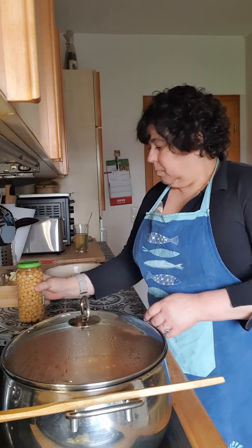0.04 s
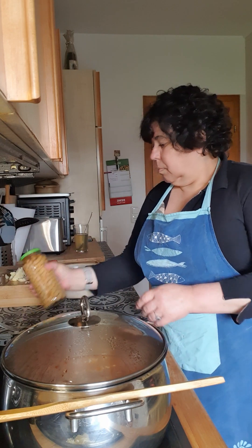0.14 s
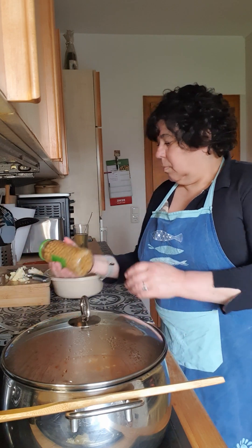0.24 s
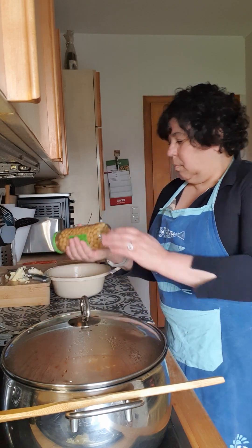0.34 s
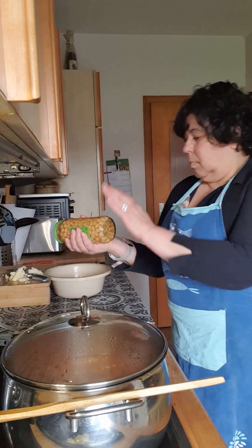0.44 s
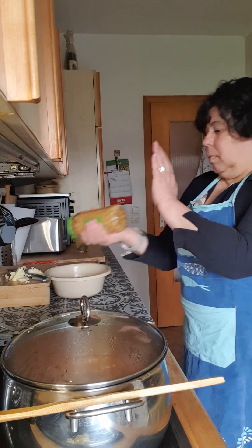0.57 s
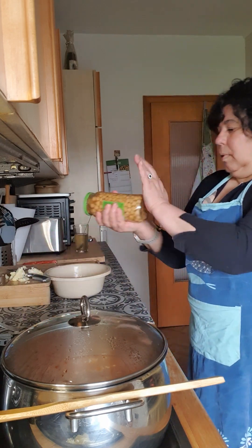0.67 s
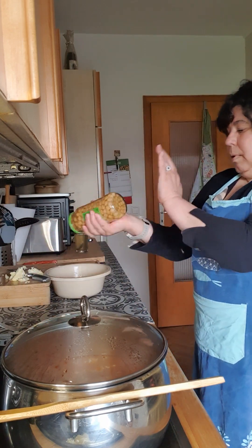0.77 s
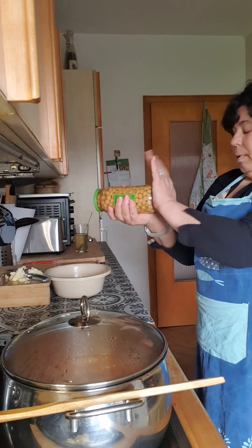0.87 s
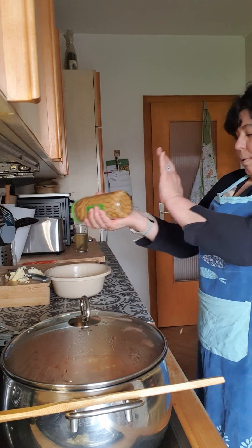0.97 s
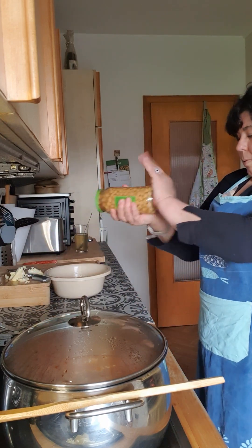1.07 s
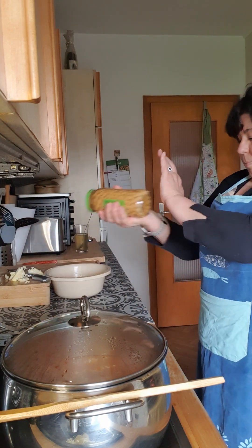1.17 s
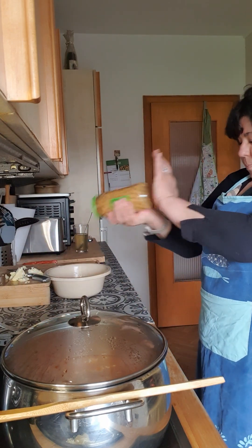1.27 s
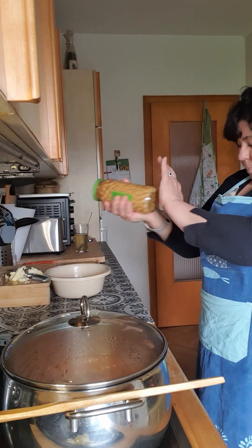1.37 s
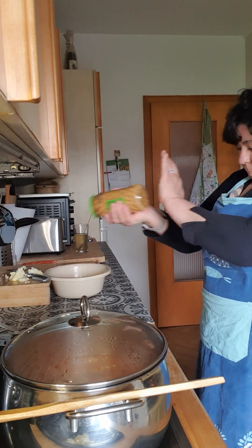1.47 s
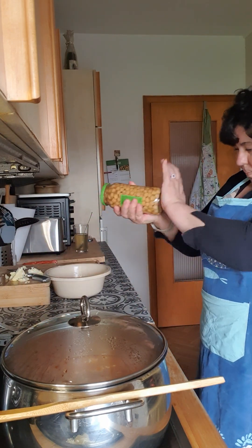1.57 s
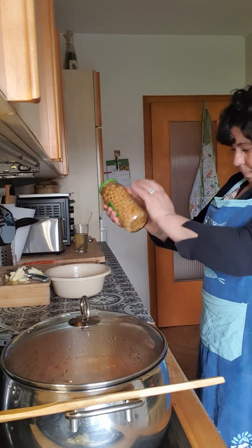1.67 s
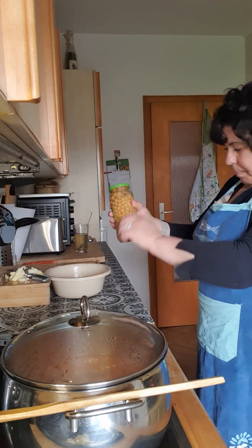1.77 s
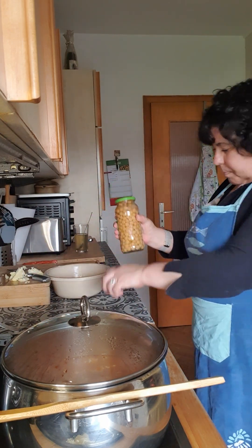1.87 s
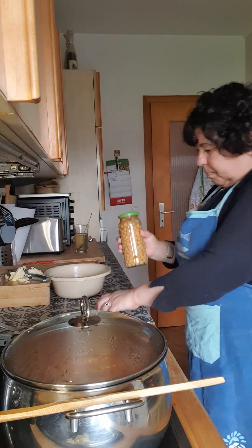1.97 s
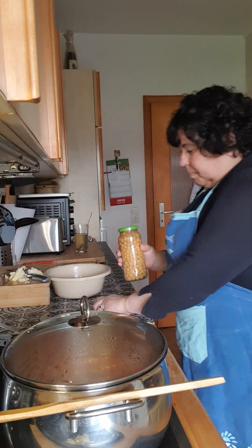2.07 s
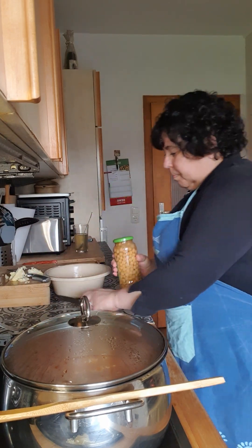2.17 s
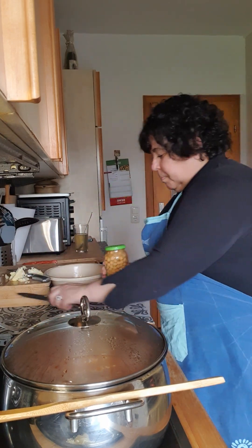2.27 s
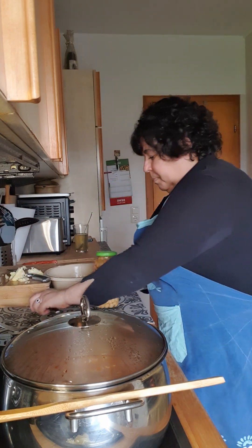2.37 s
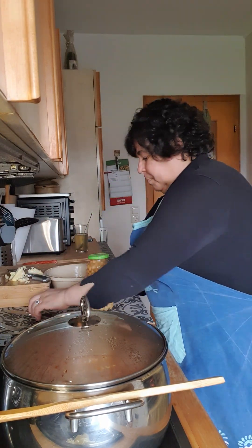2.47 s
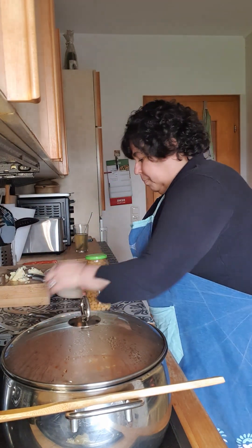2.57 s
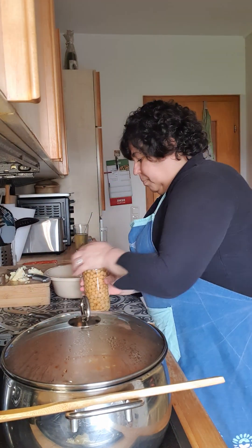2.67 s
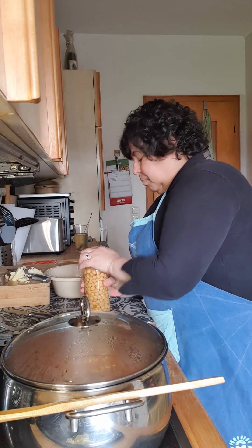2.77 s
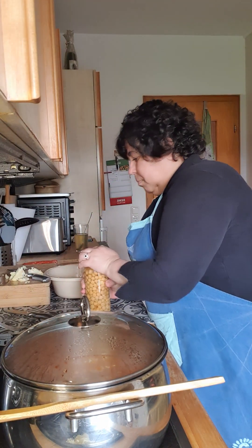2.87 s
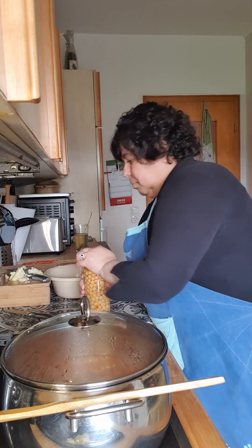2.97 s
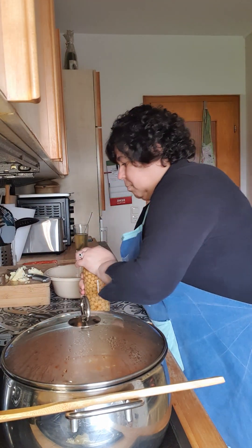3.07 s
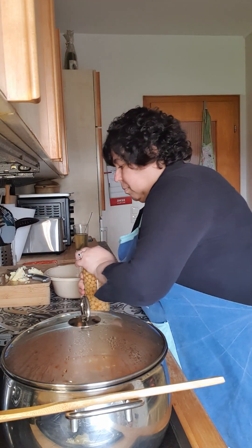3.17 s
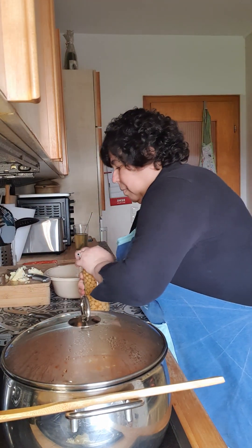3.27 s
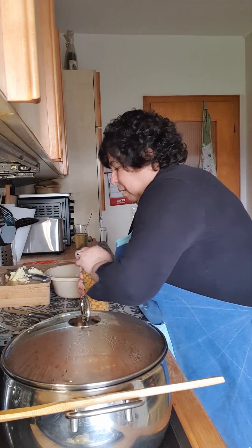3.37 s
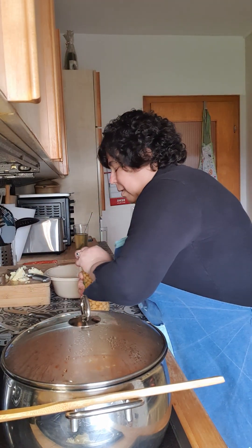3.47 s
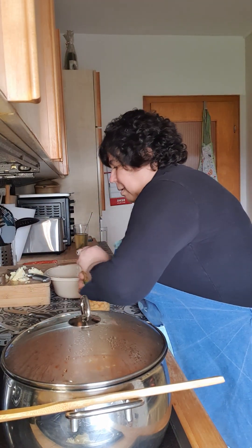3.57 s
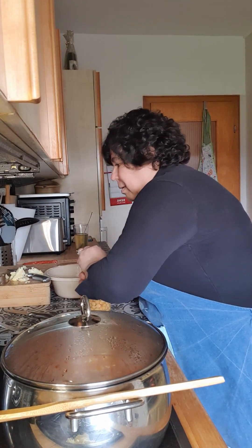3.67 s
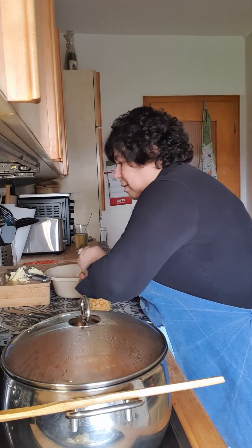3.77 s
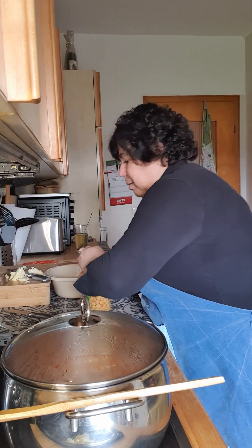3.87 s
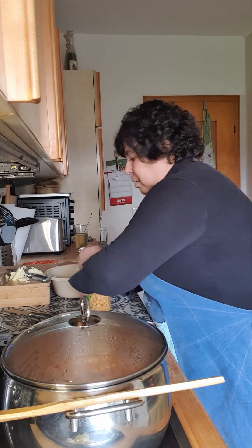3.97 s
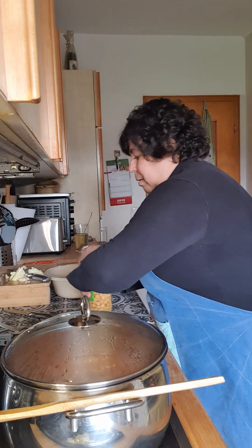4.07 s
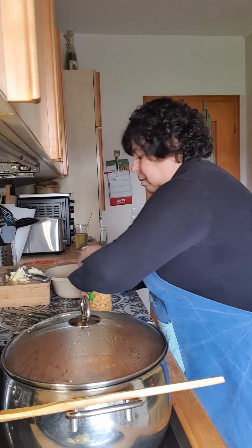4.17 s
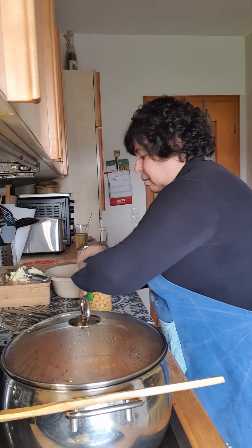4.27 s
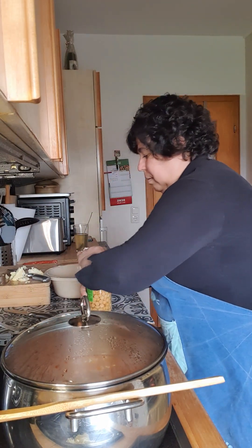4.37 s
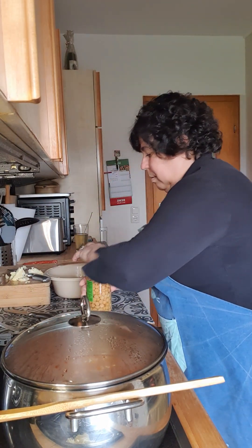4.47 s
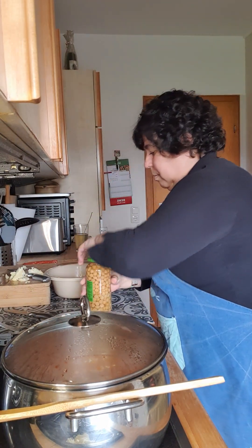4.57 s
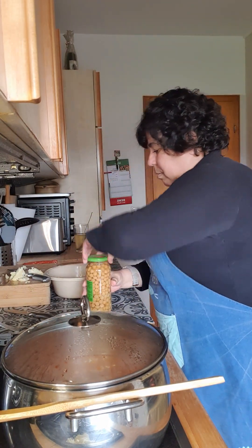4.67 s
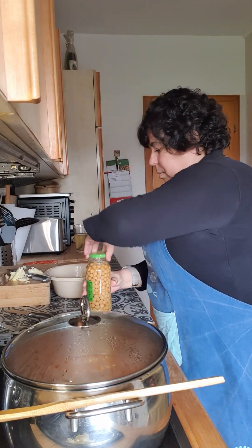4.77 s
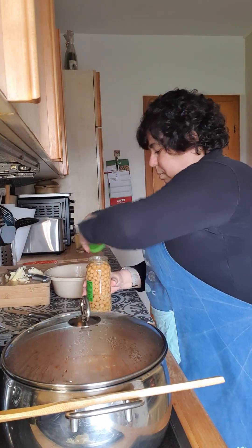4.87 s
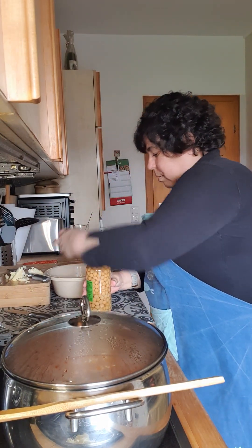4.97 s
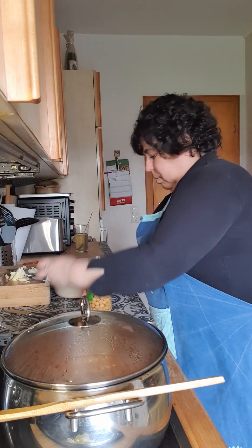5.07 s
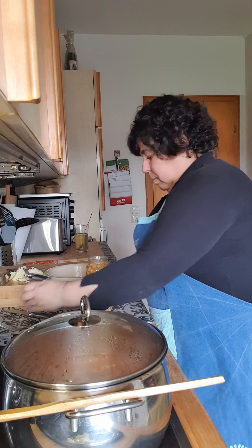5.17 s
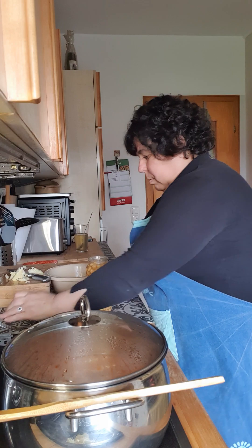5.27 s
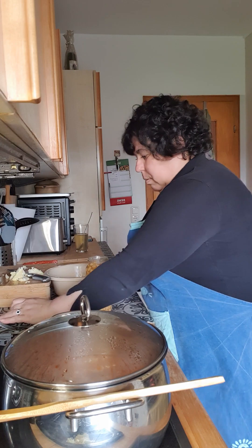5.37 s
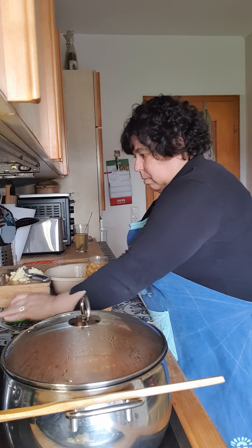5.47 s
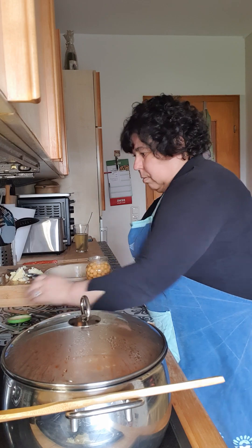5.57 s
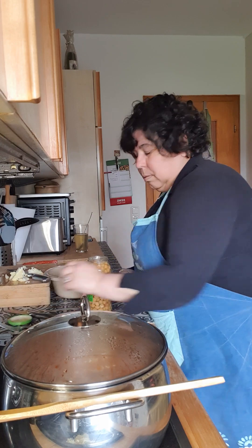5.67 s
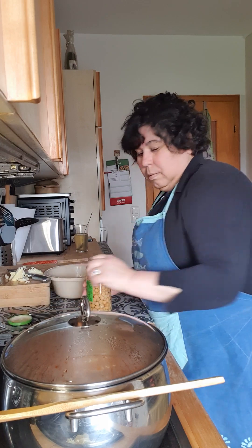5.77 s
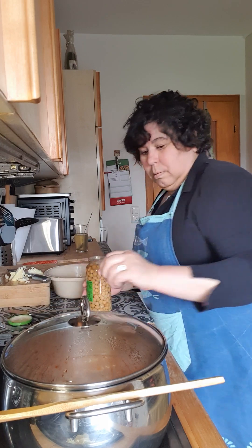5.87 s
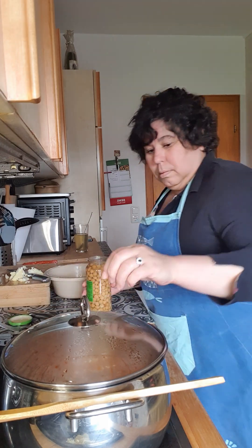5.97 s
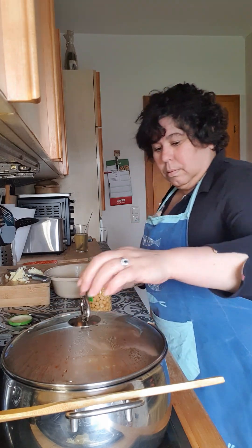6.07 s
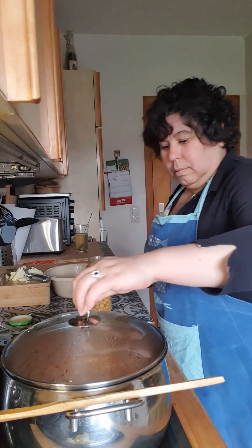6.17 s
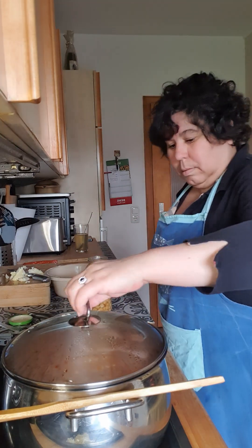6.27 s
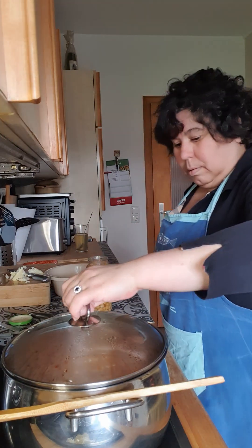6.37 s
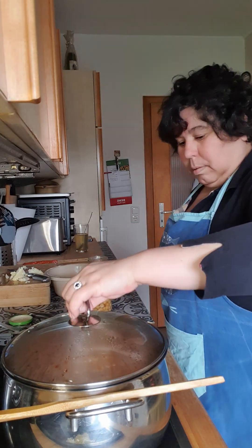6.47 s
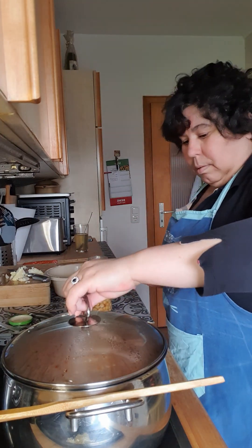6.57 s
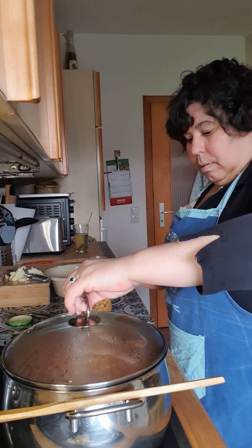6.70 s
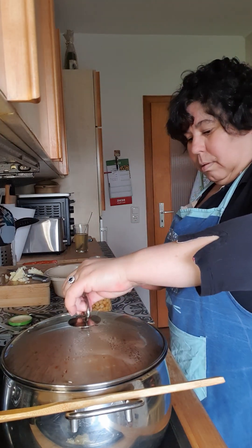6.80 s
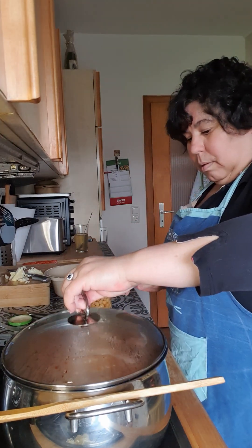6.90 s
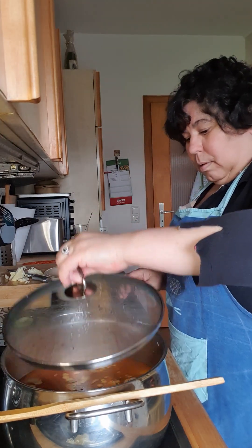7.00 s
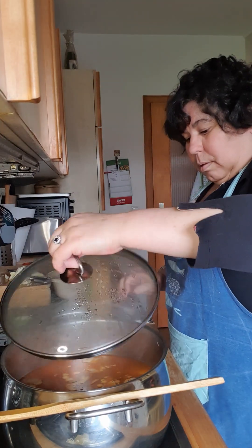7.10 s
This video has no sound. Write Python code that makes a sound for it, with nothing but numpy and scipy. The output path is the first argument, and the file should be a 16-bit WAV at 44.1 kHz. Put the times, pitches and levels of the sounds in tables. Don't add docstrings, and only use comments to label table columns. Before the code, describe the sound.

In a small kitchen, a hand smacks a jar's base five times, a blade pries the lid until it pops, then a cap and pot lid clatter.

```python
import sys
import numpy as np
from scipy import signal
from scipy.fft import rfft, irfft, next_fast_len
from scipy.io import wavfile
from scipy.ndimage import uniform_filter1d

SR = 44100
rng = np.random.default_rng(int(sys.argv[2]) if len(sys.argv) > 2 else 0)


def elevation(decibels):
    levels = np.asarray(decibels, float)
    return 10 ** (levels / 20)


def wrap_up_sound(samples):
    columns = np.atleast_2d(samples).T
    tamed = np.clip(columns, -1, 1)
    steps = np.round(tamed * 32767).astype(np.int16)
    wavfile.write(sys.argv[1], SR, steps)


N = 314829
SIZE = 4096


def rms_one(x):
    return x / np.sqrt(np.mean(x ** 2) + 1e-20)


def at_hz(points, hz):
    table_hz, values = np.array(points).T
    return np.interp(np.log(hz + 1), np.log(table_hz), values)


def band_pass(x, order, edges_hz):
    return signal.sosfilt(signal.butter(order, edges_hz, "band", fs=SR, output="sos"), x)


def peaks_power(peaks, hz, steep=1):
    return sum(elevation(2 * db) / (1 + (2 * (hz - f) / width) ** 2) ** steep for f, width, db in peaks)


def shaped(x, gain_at):
    size = next_fast_len(x.shape[-1])
    hz = np.fft.rfftfreq(size, 1 / SR)
    return rms_one(irfft(rfft(x, size) * gain_at(hz), size)[..., :x.shape[-1]])


# (frequency [Hz], correlation [0-1])
PORT_LIKENESS = [(60, 0.9), (130, 1), (290, 0.6), (640, 0.83), (1400, 0.0074), (16000, 0.0092)]


def two_ports(size):
    size_fft = next_fast_len(size)
    alike = np.clip(at_hz(PORT_LIKENESS, np.fft.rfftfreq(size_fft, 1 / SR)), 0, 1)
    mid, side = rfft(rng.standard_normal((2, size_fft)))
    common = np.sqrt(1 + alike) * mid
    opposed = np.sqrt(1 - alike) * side * [[1], [-1]]
    return irfft((common + opposed) / np.sqrt(2))[:, :size]


# (frequency [Hz], T60 [s])
ECHO_T60 = [(60, 0.33), (160, 0.31), (420, 0.39), (1100, 0.473), (2900, 0.3233), (7700, 0.3234),
            (16000, 0.26)]


def kitchen_echoes(count=6):
    echo_db, rise_s = -22, 0.0025
    t, tails = np.arange(6 * SIZE) / SR, 0
    octaves_hz = 40 * 2 ** np.arange(10)
    white = rfft([two_ports(len(t)) for _ in range(count)])
    place = np.log2(np.fft.rfftfreq(len(t), 1 / SR) / octaves_hz[0] + 1e-9)
    for k, hz in enumerate(octaves_hz):
        band = irfft(white * np.clip(1 - np.abs(place - k), 0, 1))
        tails = tails + band * elevation(-60 * t / at_hz(ECHO_T60, hz))
    return elevation(echo_db) * tails * (1 - np.exp(-t / rise_s))


def struck(body, thud_db, bright_db, focus_hz, broad_db, steep):
    broad, resonances = body
    hz = np.fft.rfftfreq(4 * SIZE, 1 / SR)
    gain = np.sqrt(elevation(2 * (at_hz(broad, hz) + broad_db)) + peaks_power(resonances, hz, steep))
    gain = gain * elevation(thud_db / (1 + (hz / 500) ** 2) + bright_db / (1 + (5500 / (hz + 1)) ** 4))
    gain = gain * elevation(4.9 / (1 + ((hz - focus_hz) / (0.13 * focus_hz)) ** 2))
    gain = gain / np.sqrt(np.mean(gain[hz > 270] ** 2))
    cepstrum = irfft(np.log(gain + 1e-9))
    cepstrum[1:2 * SIZE] *= 2
    cepstrum[2 * SIZE + 1:] = 0
    return irfft(np.exp(rfft(cepstrum)))[:2 * SIZE]


def contacts(events, body, echoes, contact_s, broad_db, direct_db, wet_db, steep=1.1):
    left_lag, contact_lag_s = 5, 0.0012
    sharpness, ring_share, plain_share = 3.0, 1.7, 0.55
    out, t = np.zeros((2, N + 8 * SIZE)), np.arange(1024) / SR
    for s, db, thud_db, bright_db, focus_hz in events:
        burst = rng.standard_normal(len(t)) * np.exp(-t / contact_s)
        burst = (burst / np.sqrt((burst ** 2).sum()) + 0.3 * (t == 0)) / np.sqrt(2)
        ringing = signal.lfilter(*signal.iirpeak(focus_hz, sharpness, fs=SR), burst)
        burst = plain_share * burst + ring_share * ringing
        tap = elevation(db) * struck(body, thud_db, bright_db, focus_hz, broad_db, steep)
        direct = elevation(direct_db) * signal.fftconvolve(tap, burst)
        spot = echoes[rng.integers(len(echoes))]
        heard = elevation(wet_db) * signal.fftconvolve(tap[None], spot, axes=1)
        heard[0, left_lag:left_lag + len(direct)] += direct
        heard[1, :len(direct)] += direct
        at = round((s + contact_lag_s) * SR)
        out[:, at:at + heard.shape[1]] += heard
    return out[:, :N]


# (frequency [Hz], level [dB per Hz])
HUSH_COLOUR = [(18, -44), (30, -3), (145, 1.5), (252, -12), (437, -20.5), (740, -19), (1350, -25),
               (1670, -25.5), (2230, -32.5), (3770, -31), (7270, -39), (11700, -42), (16000, -48)]


def hush():
    return elevation(-67) * shaped(two_ports(N), lambda hz: elevation(at_hz(HUSH_COLOUR, hz)))


# (time [s], level [dB])
BOOM_LEVEL = [(0.0, -61), (0.59, -79.5), (0.77, -53), (0.95, -62.5), (1.89, -63), (2.33, -45.5),
              (2.56, -75.5), (2.68, -47.5), (3.2, -67), (3.58, -55.5), (3.69, -43), (3.86, -63.5),
              (4.19, -50.5), (4.6, -67.5), (5.3, -86), (5.63, -61.5), (6.84, -79), (7.1, -39)]
# (frequency [Hz], width [Hz], level [dB])
BOOM_MODES = [(56.4, 61, -7.5), (103.8, 16, -4), (153, 14, -4), (215.7, 50, -10), (260, 120, -12.5)]


def boom():
    s, db = np.transpose(BOOM_LEVEL)
    lumps = elevation(3.0 * rms_one(uniform_filter1d(rng.standard_normal(N), size=1500)))
    low = shaped(two_ports(N) * lumps, lambda hz: peaks_power(BOOM_MODES, hz))
    return elevation(np.interp(np.arange(N) / SR, s, db)) * low


# (time of peak [s], time to fade 20 dB [s], peak level [dB], extra dull [dB], extra hiss [dB])
STROKES = [(0.112, 0.84, -70, 1, -7), (0.524, 0.69, -70, -8, -7), (1.9, 0.63, -74, 5.5, -24),
           (2.085, .12, -63, -4, -16), (2.235, 0.2148, -43.5, 3, -1.5), (2.3, 0.24, -45.5, -14.5, -2.5),
           (3.0, .5, -67.5, 1.5, -7.5), (3.44, .5, -62.5, -0.5, -7.5), (3.57, 0.25, -64, 2.5, -1.5),
           (3.662, 0.1142, -57, 4, -9.5), (5.5, 0.0019, -75, 21, -5.5), (5.58, 0.1919, -64.5, 5, -17),
           (5.74, 0.2978, -62.5, 2.5, -19), (5.86, 0.38, -72.5, -5, -13), (6.62, 1.5, -83, 2.5, -12),
           (6.932, 0.0327, -66, 25, 0), (7.004, 0.12, -44, 2, -6), (7.05, .5, -64.5, 16, -16.5)]
# (frequency [Hz], level [dB per Hz])
CLOTH = [(150, -47), (250, -11.5), (393, 1.5), (436, -8.5), (468, -2.5), (618, -3.5), (875, -10.5),
         (2280, -12.5), (3460, -9.5), (7980, -20.5), (12000, -22.5), (16000, -31)]
# (frequency [Hz], width [Hz], level [dB])
SLEEVE_TONES = [(3900, 900, -12), (6100, 700, -16), (8900, 700, -22)]


def rubbing():
    rise_share = 0.3954
    t, powers = np.arange(N) / SR, np.zeros((3, N))
    for s, fade_s, db, dull_db, hiss_db in STROKES:
        away_s = np.maximum(t - s, (s - t) / rise_share)
        swell = elevation(2 * db - 2 * 20 * away_s / fade_s)
        powers += swell * elevation([[2 * dull_db], [0], [2 * hiss_db]])
    clumps = elevation(1.3 * rms_one(uniform_filter1d(rng.standard_normal(N), size=90)))

    def cloth_gain(hz):
        return np.sqrt(elevation(2 * at_hz(CLOTH, hz)) + peaks_power(SLEEVE_TONES, hz))

    fibres = shaped(two_ports(N) * clumps, cloth_gain)
    dull_mid_hiss = [band_pass(fibres, 3, edges) for edges in ([280, 1200], [1200, 6000], [6000, 17000])]
    return sum(gain * rms_one(part) for gain, part in zip(np.sqrt(powers), dull_mid_hiss))


def stick_slip(table):
    out, t = np.zeros((2, N)), np.arange(SIZE * 8) / SR
    for start, end, start_db, end_db, centre_hz in table:
        width_hz = 270 + 0.045 * centre_hz
        level_db = np.interp(t, [0, end - start, end - start + 0.49], [start_db, end_db, end_db - 50.5])
        sound = shaped(two_ports(len(t)), lambda hz: peaks_power([(centre_hz, width_hz, 0)], hz))
        at = round(start * SR)
        out[:, at:at + len(t)] += (sound * elevation(level_db) * np.minimum(t / 0.004, 1))[:, :N - at]
    return out


# (start time [s], end time [s], start level [dB], end level [dB], centre [Hz])
CREAKS = [(1.91, 2.028, -73.5, -69.5, 1950), (3.038, 3.171, -69, -70.5, 1660),
          (3.997, 4.077, -57, -56, 1250), (4.006, 4.027, -58.5, -61, 2557), (4.033, 4.075, -62, -48, 2095),
          (4.036, 4.073, -64.5, -63, 3900), (4.037, 4.073, -68, -55.5, 5100),
          (6.908, 6.985, -68, -66, 3900), (6.985, 7.005, -56, -54, 3900), (3.33, 3.72, -69, -74, 5078),
          (3.2, 3.73, -75, -68, 2240), (6.931, 7.004, -72, -65, 8870)]
# (start time [s], end time [s], start level [dB], end level [dB], centre [Hz])
WHISPERS = [
    (4.03, 4.072, -80, -72, 11800),
    (4.0, 4.072, -88, -72, 7500),
    (4.24, 4.33, -85, -86, 11000),
    (4.25, 4.33, -86, -87, 13500),
]


def creaks():
    return stick_slip(CREAKS) + stick_slip(WHISPERS)


# (time [s], peak level [dB], thud [dB], favoured pitch [Hz])
FINGERS = [(0.156, -43, 15.5, 2915), (0.2402, -52, -6.5, 9450), (1.53, -44.5, -0.5, 2500),
           (1.8887, -52, 3.5, 1870), (2.0759, -55, 6, 1724), (2.1068, -48, 6, 2640),
           (2.1541, -49, -2, 2200), (2.2332, -32, -3, 1790), (3.331, -53.5, -44, 5000),
           (3.367, -49.5, -32, 3800), (3.4333, -49, -23, 3600), (3.5325, -46, -17.5, 2416),
           (3.6077, -49, -13, 2240), (3.6451, -37.5, -4.5, 2570), (3.7702, -44, -16.5, 4045),
           (3.998, -52, 2, 1364), (6.1239, -42, -52, 2750), (6.1235, -46, -30, 1600),
           (6.126, -44, -52, 4050),]
# (time [s], peak level [dB], thud [dB], brightness [dB], favoured pitch [Hz])
GRAZES = [
    (2.0613, -50, 0, -6, 3500),
    (2.0772, -47, 0, -6, 4300),
    (2.5177, -36, -30, 12, 12500),
    (2.6516, -44, -30, 10, 13000),
    (4.366, -52, -20, -4, 3500),
    (5.832, -52, -10, -4, 2500),
    (6.9985, -42, -10, 0, 5400),
]
# (frequency [Hz], width [Hz], level [dB])
GRIP = ([(59, -31.5), (100, -5.5), (662, -14.5), (970, -20), (1330, -12), (1760, -15.5), (3700, -16.5),
         (6150, -23.5), (7450, -30.5), (12700, -31), (16000, -51)], [(2723, 220, -15.5), (3900, 360, -14.5)])


def fingers(echoes):
    touches = [(s, db, thud_db, -1.5, hz) for s, db, thud_db, hz in FINGERS]
    return (contacts(touches, GRIP, echoes, contact_s=0.0012, broad_db=-3, direct_db=15, wet_db=7)
            + contacts(GRAZES, GRIP, echoes, contact_s=0.0015, broad_db=0, direct_db=15, wet_db=8))


# (time [s], peak level [dB], thud [dB], brightness [dB], favoured pitch [Hz])
KNOB_TICKS = [
    (6.3142, -45, -1, -7, 3726),
    (6.353, -52, -1, 6, 3730),
]
POT_LID = [
    (6.527, -62.5, 29, -8, 699),
    (6.872, -56.5, 34.5, -8.5, 695),
    (6.909, -43, 10, 0, 750),
    (6.9275, -34, 8, -16, 750),
    (7.008, -35, 24, -4.5, 700),
]
LID_RIM = [
    (7.0195, -22.5, -2, -8.5, 3400),
    (7.027, -25, -2, -8.5, 2700),
]
# (frequency [Hz], width [Hz], level [dB])
KNOB = ([(300, -45), (1500, -35.5), (4000, -30.5), (6000, -40.5), (16000, -47.5)], [(1830, 56, -1),
         (3150, 90, -7), (3832, 40.4, 9.5), (4000, 64, 3), (4240, 49, 2), (9140, 70, -15)])
POT = ([(35, -45.5), (60, -7), (103, 6), (323, -18.5), (448, -12), (621, -39.5), (946, -10.5),
        (1820, -32.5), (1950, -30), (2710, -55.5), (16000, -70.5)], [(100.8, 27.8, 1.5), (446.1, 11.9, -1),
        (750, 320, -17.5), (1537, 51.4, -14.5), (1828, 11.8, -10.5), (2628, 400, -32), (3433, 270, -36)])
RIM = ([(100, -12), (330, -12), (450, -8), (620, -18), (950, -10), (1500, -15), (2100, -24), (3700, -24),
        (4200, -45), (16000, -55)], [(446, 14, 2), (1537, 50, -9), (1828, 14, -7), (2700, 250, -14),
        (3000, 150, -16), (3450, 270, -14)])


def pot_lid(echoes):
    return (contacts(KNOB_TICKS, KNOB, echoes, contact_s=0.0006, broad_db=-3, direct_db=19, wet_db=1)
            + contacts(POT_LID, POT, echoes, contact_s=0.003, broad_db=-4.5, direct_db=17, wet_db=11.5)
            + contacts(LID_RIM, RIM, echoes, contact_s=0.003, broad_db=0, direct_db=17, wet_db=9))


# (time [s], peak level [dB], thud [dB], brightness [dB], favoured pitch [Hz])
CAP_OFF = [
    (4.6967, -23, -1, 1, 3500),
    (4.8444, -65.5, -1, 0.85, 3500),
]
# (frequency [Hz], width [Hz], level [dB])
CAP = ([(120, -49), (200, -18), (851, -12.5), (1060, -21), (1320, -5.5), (2910, -12.5), (3620, -6),
        (5630, -23.5), (11100, -22.5), (16000, -26)], [(1240, 119, -8), (2230, 204, -9.5), (3485, 110, -2),
        (3750, 200, -7), (4250, 120, -6), (6180, 143, -15.5), (7880, 164, -14), (10990, 324, -10)])


def cap_off(echoes):
    return contacts(CAP_OFF, CAP, echoes, contact_s=0.0116, broad_db=-3.5, direct_db=11.5, wet_db=12.5)


# (frequency [Hz], width [Hz], level [dB])
CAP_ON_COUNTER = ([(59, -34), (100, 4.5), (289, 1.5), (365, 6), (705, -3.5), (872, -11), (1550, -21),
                   (3780, -12.5), (9210, -13.5), (16000, -22.5)], [(366, 43, -11.5), (873.2, 45, 2),
                   (2629, 495, -6), (3500, 270, -20), (5724, 540, -5), (8810, 330, -5.5), (10600, 480, -12)])


def cap_wobble(echoes, count=7):
    start_s, gap_s, shrink, drag_s = 5.4115, 0.148, 0.8, 0.021
    landing_thud_db, rim_thud_db = -4.5, -25
    landing_bright_db, rim_bright_db = -26, -6.5
    k = np.arange(count)
    s = start_s + gap_s * (1 - shrink ** k) / (1 - shrink) - drag_s * k
    db = -31 - 2.93 * np.maximum(k - 2, 0)
    flat = 0.253 ** k
    thud_db = rim_thud_db + (landing_thud_db - rim_thud_db) * flat
    bright_db = rim_bright_db + (landing_bright_db - rim_bright_db) * flat
    touches = list(zip(s, db, thud_db, bright_db, np.full(count, 3600)))
    return contacts(touches, CAP_ON_COUNTER, echoes, contact_s=0.00624, broad_db=2, direct_db=16, wet_db=7.5)


# (time [s], peak level [dB], thud [dB], brightness [dB], favoured pitch [Hz])
KNIFE = [
    (2.8047, -21, -1, 0, 2430),
]
BLADE_TIP = [
    (2.9178, -30, -20, 0, 3900),
]
KNIFE_DOWN = [
    (4.4105, -32.5, 3, 0, 3760),
]
# (frequency [Hz], width [Hz], level [dB])
BLADE = ([(120, -42), (300, -11), (1000, -15), (2300, -14), (3000, -9), (3700, -15), (4600, -6.5),
          (6400, -3.5), (9000, -12), (13300, -13), (16000, -25)], [(2250, 70, -5), (2430, 90, -4),
          (2620, 100, -10), (3050, 113, -6.5), (5120, 94, 1), (6273, 96, 2), (7060, 130, 1.5),
          (9130, 120, -5.5), (11960, 120, -4)])
TIP = ([(300, -40), (1500, -22), (2600, -17), (4000, -12), (6500, -15), (9000, -20), (16000, -30)],
        [(3070, 130, -3), (3850, 90, -6), (4800, 60, -7), (5240, 200, -6), (6220, 150, -7),
        (8670, 190, -11)])
HANDLE = ([(150, -20), (600, -10), (1000, -16), (2200, -13), (4000, -13), (5500, -24), (16000, -30)],
           [(1320, 200, -3), (1620, 120, -6), (3200, 80, -7), (3760, 90, -6), (5040, 60, -10),
           (6020, 90, -8), (6970, 120, -17)])


def knife(echoes):
    return (contacts(KNIFE, BLADE, echoes, contact_s=0.0018, broad_db=-5, direct_db=13.5, wet_db=9)
            + contacts(BLADE_TIP, TIP, echoes, contact_s=0.0015, broad_db=1, direct_db=14, wet_db=8)
            + contacts(KNIFE_DOWN, HANDLE, echoes, contact_s=0.003, broad_db=1, direct_db=14, wet_db=7.5))


# (time [s], peak level [dB], thud [dB], brightness [dB], favoured pitch [Hz])
JAR_DOWN = [
    (2.5085, -20.5, 4, -15, 3540),
    (2.5177, -25, 1, -14, 3480),
    (2.5437, -21, 6, -19, 3500),
    (2.5896, -38, 3, -10, 3500),
    (2.6516, -38, 3, -8, 3500),
]
# (frequency [Hz], width [Hz], level [dB])
JAR = ([(35, -41), (60, -55.5), (139, 3.5), (202, -19), (607, -5), (1340, -25.5), (3670, -16), (5330, -20),
        (7400, -20), (9350, -19), (16000, -25)], [(131, 112, -11.5), (359.8, 30, -1.5), (557, 110, -4)])


def jar_down(echoes):
    return contacts(JAR_DOWN, JAR, echoes, contact_s=0.00102, broad_db=2.5, direct_db=22, wet_db=14.5)


# (frequency [Hz], level [dB], T60 [s])
BLADE_RING = [(5254, -5, 1.1), (6158, -3, .32), (6320, -6, .25), (6988, -14, .7), (7359, -18, .48),
              (7822, -13, .7), (8750, -15, .5), (9286, -5, .35), (9706, -15, .8), (10450, -11, .4),
              (12050, -15, .45), (12540, -14, .7), (13140, -17, .45), (13870, -18, .55)]


def blade_ring():
    start_s, gripped_s, ring_db = 2.512, 2.78, -47.5
    beat_hz, neighbour_hz = 32, 480
    t = np.arange(N) / SR - start_s
    live = (t > 0) & (t < 0.6)
    t, out = t[live], np.zeros((2, N))
    gripped = elevation(-400 * np.maximum(t + start_s - gripped_s, 0))
    since = t - (np.array(JAR_DOWN)[[2, 4], :1] - start_s)
    for hz, db, t60 in BLADE_RING:
        again = elevation(-5 - 60 * np.maximum(since, 0) / t60 - [[0], [12]]) * (since > 0)
        level = elevation(-60 * t / t60) * np.minimum(t / 0.0071, 1) + again.sum(axis=0)
        lone = hz < 5500
        phase = 2 * np.pi * (hz * t + rng.random((2, 1)) * (not lone))
        apart_hz = beat_hz * rng.uniform(-1, 1)
        partner = elevation(-4 - 9 * lone)
        pair = np.sin(phase) + partner * np.sin(phase + 2 * np.pi * (apart_hz * t + rng.random((2, 1))))
        pair += partner * np.sin(phase + 2 * np.pi * neighbour_hz * rng.uniform(-1, 1) * t)
        out[:, live] += elevation(db + ring_db) * level * pair * gripped
    return out


# (time [s], frequency [Hz], peak level [dB], T60 [s])
PINGS = [(0.7088, 4850, -9, .012), (1.1612, 4850, -15, .012), (4.0742, 4100, -8, .03),
         (4.074, 2450, -16, .02), (4.076, 110, -11.5, .16), (4.0725, 230, -17, .07), (5.4105, 866, -46, .3),
         (5.4105, 877, -48, .5), (5.65, 873, -54, .3), (5.4105, 2700, -46, .03), (5.4105, 3300, -47, .04),
         (5.637, 3850, -46, .03), (5.637, 2650, -48, .03), (6.928, 750, -40, .05), (7.0045, 102, -19, .3),
         (5.54, 870, -55, .3), (5.715, 873, -57, .35), (6.3148, 3800, -52, .12), (2.806, 2700, -40, .1),
         (2.9185, 3900, -40, .02), (2.5085, 3100, -28, .015), (2.544, 3000, -28, .015)]


def pings():
    left_lag, rise_cycles = 1, 1.2
    out, t = np.zeros((2, N + SR)), np.arange(SR // 2) / SR
    for s, hz, db, t60 in PINGS:
        swell = 1 - np.exp(-t * hz / rise_cycles)
        ring = np.sin(2 * np.pi * hz * t) * elevation(db - 60 * t / t60) * swell
        at = round(s * SR)
        out[0, at + left_lag:at + left_lag + len(t)] += ring
        out[1, at:at + len(t)] += ring
    return out[:, :N]


def air_puff():
    rise_s, swing_hz, fade_s = 0.0007, 230, 0.002
    t = np.arange(N) / SR - 4.0737
    swing = np.cos(2 * np.pi * swing_hz * t) * np.exp(-np.maximum(t, 0) / fade_s)
    puff = np.where(t < 0, np.exp(np.minimum(t, 0) / rise_s), swing) + 1e-18
    return elevation(-4) * band_pass(puff, 2, [130, 2500])


# (time [s], peak level [dB], thud [dB], brightness [dB], favoured pitch [Hz])
POP = [
    (4.073, -4.8, 0, -2, 4100),
]
# (frequency [Hz], width [Hz], level [dB])
SEAL = ([(35, -60), (70, -26), (110, -8), (371, -7.5), (503, -22.5), (1060, -8.5), (1440, -26),
         (2350, -14.5), (2840, -20), (4220, -15.5), (5250, -22), (5600, -36), (6700, -30), (9000, -32),
         (10500, -41), (14800, -48), (16000, -75)], [(112, 30, -2), (230, 50, -7), (668, 60, -17),
         (1055, 130, -10), (1790, 60, -20), (2400, 250.7, -8.5), (3150, 420, -9.5), (3870, 60, -13),
         (4110, 110, -8), (4660, 60, -20), (5030, 150, -15)])


def lid_pop(echoes):
    snap = contacts(POP, SEAL, echoes, contact_s=0.0012, broad_db=-3, direct_db=15, wet_db=12.5, steep=1.7)
    return snap + air_puff()


# (time [s], peak level [dB], thud [dB], brightness [dB], favoured pitch [Hz])
SLAPS = [
    (0.708, -4.5, -10, 3.5, 4700),
    (0.935, -8, 0.5, -2, 3568),
    (1.161, -12, -2, -6, 2800),
]
GLANCING_SLAP = [
    (1.374, -25, 19.8, 2.16, 2780),
]
LAST_SLAP = [
    (1.588, -17, 4, 8, 3330),
]
SLAP_CRACKS = [
    (0.7078, -9, 0, 0, 4850),
    (1.1608, -12, 0, 0, 4850),
]
# (frequency [Hz], width [Hz], level [dB])
PALM = ([(35, -43), (60, -14.5), (146, -1), (262, -15.5), (371, -10.5), (448, -16), (540, -11),
         (1250, -7.5), (1410, -5), (3760, -2), (4300, -3), (4700, -6), (5300, -6), (5800, -10), (6740, -10),
         (12100, -7), (16000, -18)], [(110, 29, -4.5), (150, 130, -2.5), (4800, 500, -11.5)])
CUPPED_PALM = ([(60, -14), (146, -1), (262, -14), (540, -10), (1000, -7), (2200, -8), (6740, -11),
                (16000, -16)], [(1360, 400, 7), (750, 200, -1), (3330, 300, 1)])
CRACK = ([(300, -40), (2000, -25), (8000, -25), (16000, -35)], [(4850, 900, 0)])


def jar_slaps(echoes):
    return (contacts(SLAPS, PALM, echoes, contact_s=0.0013, broad_db=8, direct_db=14, wet_db=12.5)
            + contacts(GLANCING_SLAP, PALM, echoes, contact_s=0.008, broad_db=8.5, direct_db=10, wet_db=13)
            + contacts(LAST_SLAP, CUPPED_PALM, echoes, contact_s=0.0013, broad_db=8, direct_db=14.5, wet_db=13)
            + contacts(SLAP_CRACKS, CRACK, echoes, contact_s=0.0008, broad_db=0, direct_db=14, wet_db=-3))


def scene():
    echoes = kitchen_echoes()
    background = hush() + boom() + rubbing() + creaks()
    handling = fingers(echoes) + pot_lid(echoes) + cap_off(echoes) + cap_wobble(echoes) + knife(echoes)
    jar = jar_down(echoes) + lid_pop(echoes) + jar_slaps(echoes)
    return background + handling + blade_ring() + pings() + jar


# (frequency [Hz], left over right level [dB])
PORT_TILT = [(60, 1.5), (110, -0.5), (200, -1.5), (380, 1.5), (700, 2.5), (1290, 1.5), (2380, 3),
             (4400, 6.5), (8120, -1.5), (15000, -0.5)]


def unequal_ports(sound):
    size = next_fast_len(N + SIZE)
    tilt_db = at_hz(PORT_TILT, np.fft.rfftfreq(size, 1 / SR)) / 2
    return irfft(rfft(sound, size) * elevation([tilt_db, -tilt_db]), size)[:, :N]


def roll_off(x):
    return signal.sosfilt(signal.butter(12, 16850, fs=SR, output="sos"), x)


def record(dry):
    bass_cut = signal.butter(2, 48, "high", fs=SR, output="sos")
    ports = signal.sosfilt(bass_cut, unequal_ports(dry))
    rounded = ports / (1 + (ports / 1.2) ** 4) ** (1 / 4)
    top_cut = signal.cheby2(16, 70, 16700, fs=SR, output="sos")
    mix = signal.sosfilt(top_cut, rounded)
    return roll_off(mix)


dry = scene()
out = record(dry)
wrap_up_sound(out)
```